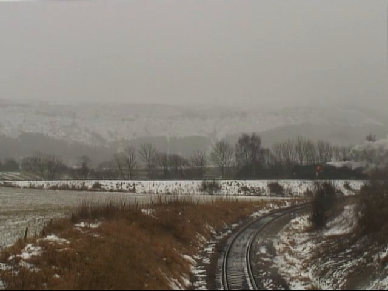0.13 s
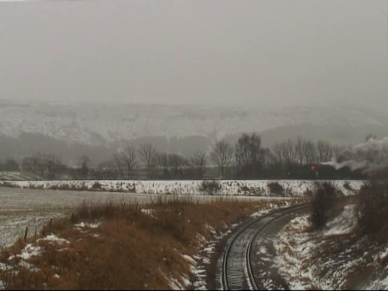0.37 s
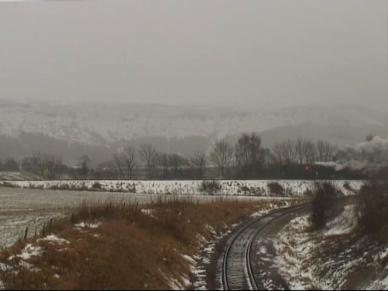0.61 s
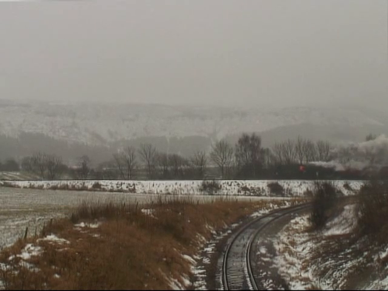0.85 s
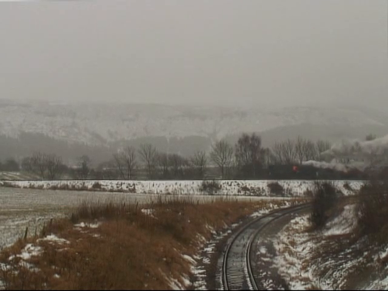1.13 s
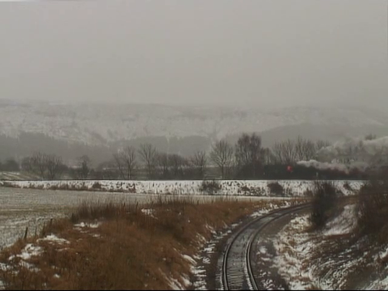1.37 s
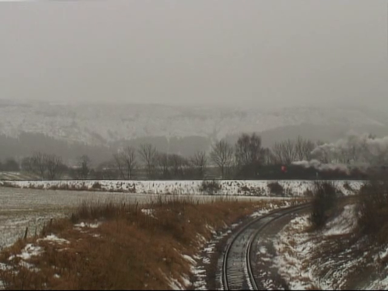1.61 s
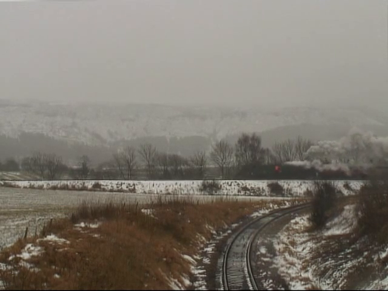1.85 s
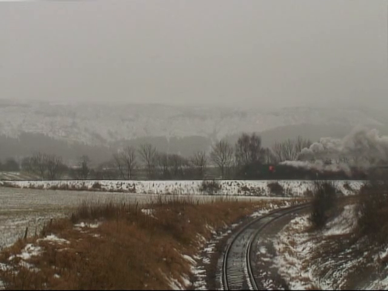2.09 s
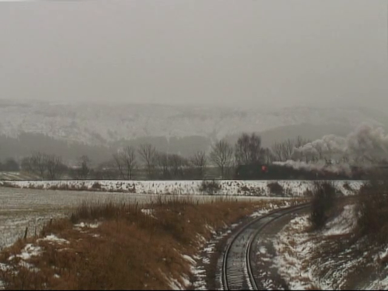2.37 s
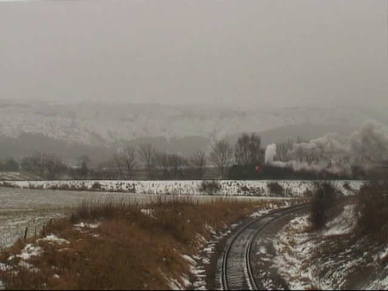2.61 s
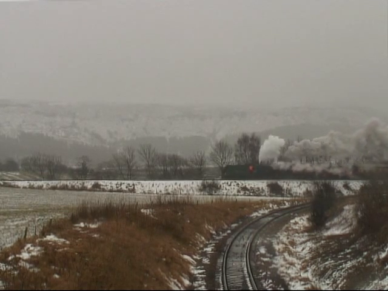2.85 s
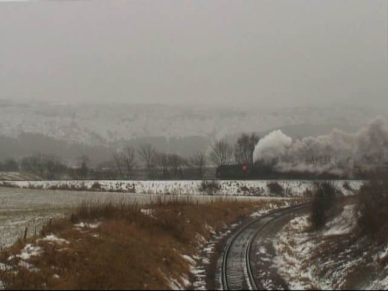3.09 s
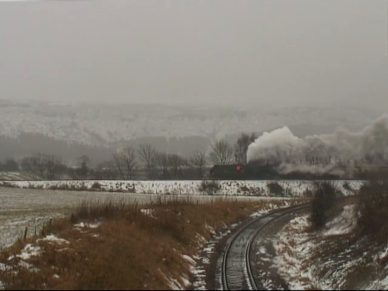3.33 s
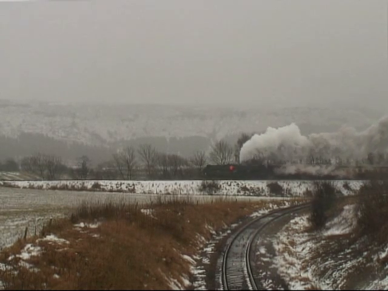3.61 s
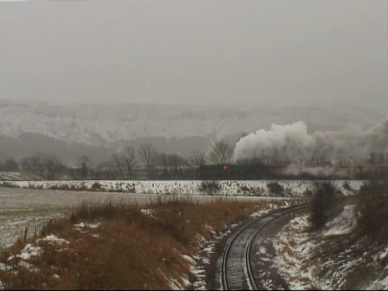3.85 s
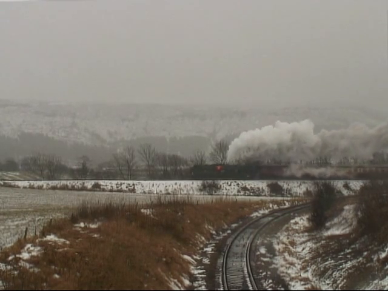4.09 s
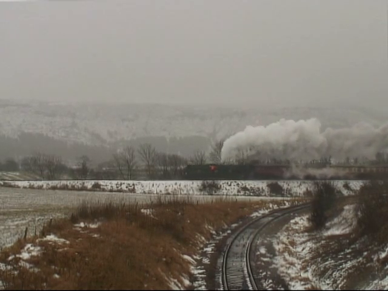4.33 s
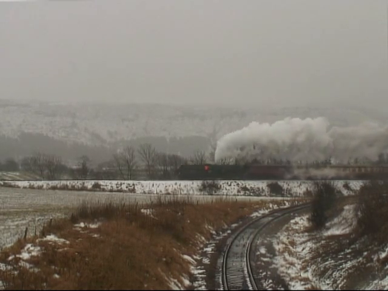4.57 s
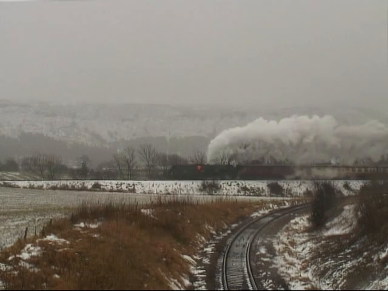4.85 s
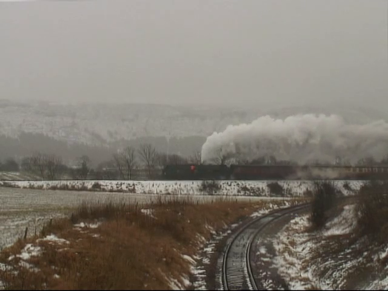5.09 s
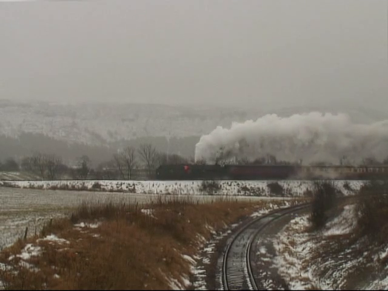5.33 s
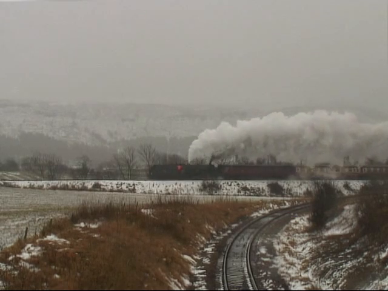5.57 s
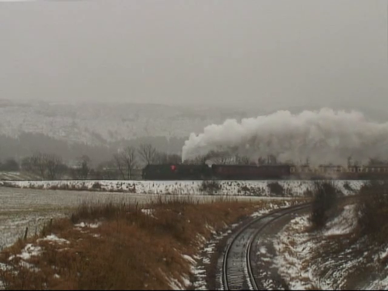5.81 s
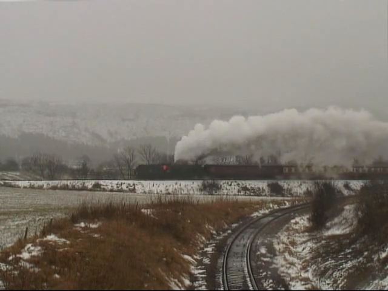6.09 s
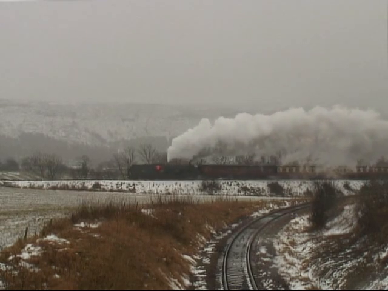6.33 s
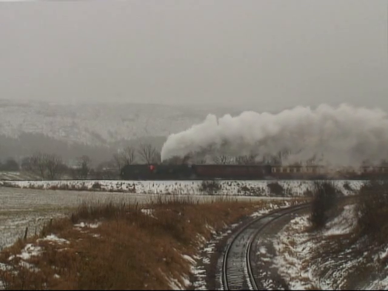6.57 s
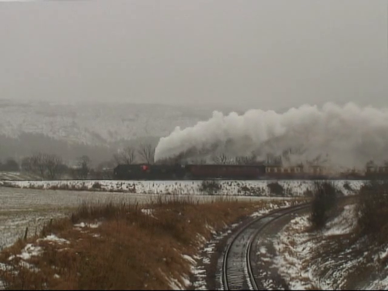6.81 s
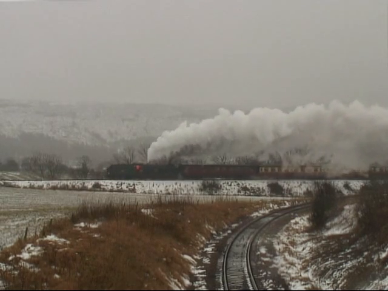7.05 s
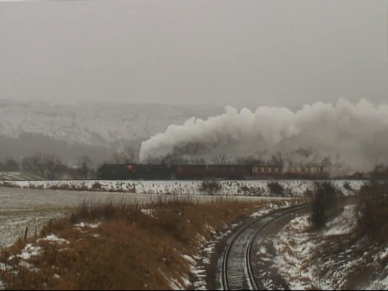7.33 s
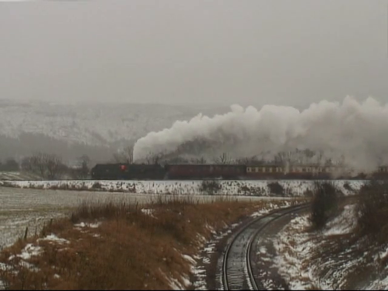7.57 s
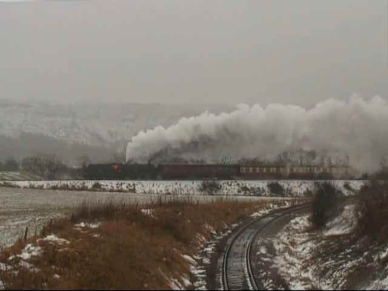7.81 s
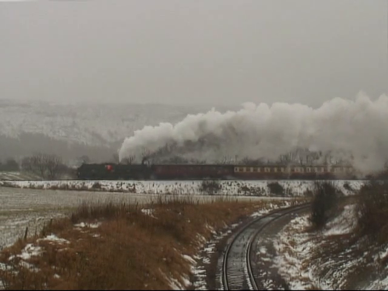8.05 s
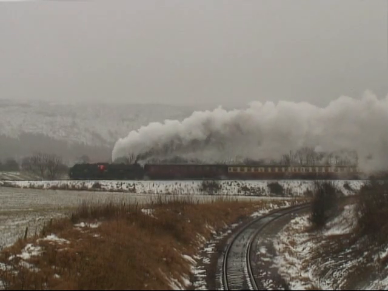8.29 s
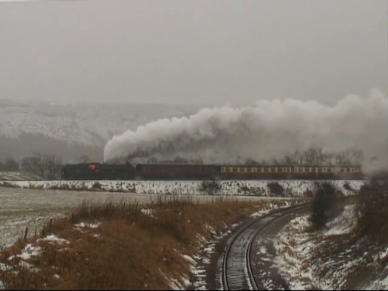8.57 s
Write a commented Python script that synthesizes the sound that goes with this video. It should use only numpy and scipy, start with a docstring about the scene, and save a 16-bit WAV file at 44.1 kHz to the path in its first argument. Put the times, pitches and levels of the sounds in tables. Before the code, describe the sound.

Quiet at first: rapid muffled exhaust beats, faint rumble, a breathy leak of steam swelling about once a second, and slight tape-camera hiss. At about 3.2 seconds a jet of steam erupts abruptly, far louder, with a short hollow echo off snow. It holds as a rushing roar, its brightness and strength wavering, while chuffs sink beneath. Outdoors, distant, with small wind thumps and a dull left channel.

```python
"""Soft exhaust beats and a thin hiss of leaking steam come first, from a three-cylinder steam locomotive
some way off across snowy fields; six beats make a wheel turn. Each beat is ragged noise ringing in the chimney.
The leak is shaped noise that swells about once a turn; filtered noise makes the rumble and the light wind.
Then the safety valve lifts: a jet of noise whose roar wavers through moving air, with an echo off the snow.
A tape camcorder adds hiss, a faint whine and a muffled left microphone port."""
import sys
import numpy as np
from scipy import signal
from scipy.fft import rfft, irfft
from scipy.io import wavfile
from scipy.ndimage import uniform_filter1d

SR = 44100
rng = np.random.default_rng(int(sys.argv[2]) if len(sys.argv) > 2 else 0)


def pcm_store(signal):
    """Save signal as 16-bit PCM."""
    levels = np.round(np.clip(np.atleast_2d(signal), -1, 1) * 32767)
    wavfile.write(sys.argv[1], SR, levels.astype(np.int16).T)


def nominal_scale(level):
    """Amplitude ratio for a level in decibels (scalar or array-like)."""
    x = np.asarray(level, float) / 20
    return 10 ** x


N = 382788  # length in samples


def evened(x):
    """Scales a sound to an rms of 1."""
    return x / np.sqrt(np.mean(x ** 2) + 1e-20)


def read(points, hz):
    """Reads a curve of (frequency, value) points on a log-frequency axis."""
    f, value = np.transpose(points)
    return np.interp(np.log(hz + 1), np.log(f + 1), value)


def add(mix, s, sound):
    """Mixes a sound in at time s."""
    part = mix[max(round(s * SR), 0):][:len(sound)]
    part += sound[:len(part)]


def coloured(tone, channels=1):
    """Steady noise of rms 1 with the given spectrum."""
    spectrum = rfft(rng.standard_normal((channels, N)))
    spectrum = spectrum * nominal_scale(read(tone, np.fft.rfftfreq(N, 1 / SR)))
    return evened(irfft(spectrum, N))


def ragged_gain(depth_db, smooth):
    """A randomly wandering gain; smooth is its averaging length in samples."""
    return nominal_scale(depth_db * evened(uniform_filter1d(rng.standard_normal(N), size=smooth)))


def level_curve(rows):
    """Turns (time, dB) rows into a gain at every sample."""
    s, db = np.transpose(rows)
    return nominal_scale(np.interp(np.arange(N) / SR, s, db))


def ramp(hz, lo_hz, hi_hz):
    """0 below lo_hz, 1 above hi_hz, straight on a log-frequency axis."""
    return np.clip(np.log((hz + 1) / lo_hz) / np.log(hi_hz / lo_hz), 0, 1)


def hump(hz, centre_hz, width):
    """A bell shape on the log-frequency axis."""
    return np.exp(-(np.log((hz + 1) / centre_hz) / width) ** 2)


def bell(t, start, length):
    """Half a sine from start to start + length."""
    return np.sin(np.pi * np.clip((t - start) / length, 0, 1))


def steam(tone, s, flow_db, shape_db, gust_db, band_db, flicker_db):
    """Jet noise with a spectrum bent by shape_db(hz, t); eddies add wide gusts, thin bands and flicker."""
    size, hop = 512, 128  # samples per short-time frame and per step
    frames, hz = N // hop + 6, np.fft.rfftfreq(size, 1 / SR)
    t = np.arange(frames) * hop / SR
    real, imaginary, gusts, bands = rng.standard_normal((frames, len(hz), 4)).T
    # axis 0 smooths across frequency, axis 1 across time
    gusts = evened(uniform_filter1d(uniform_filter1d(gusts, size=10, axis=0), size=22, axis=1))
    bands = evened(uniform_filter1d(uniform_filter1d(bands, size=3, axis=0), size=50, axis=1))
    flicker = evened(uniform_filter1d(rng.standard_normal(frames), size=4))
    eddies_db = gust_db * gusts + band_db * bands + flicker_db * flicker
    gain = nominal_scale(read(tone, hz)[:, None] + shape_db(hz[:, None], t) + eddies_db)
    # slow level changes in the middle band are evened out, so that flow_db sets them
    core = (hz > 1200) & (hz < 4500)
    gain /= np.sqrt(uniform_filter1d((gain[core] ** 2).sum(0), size=30))
    jet = signal.istft((real + 1j * imaginary) * gain, nperseg=size, noverlap=size - hop)[1][:N]
    return evened(jet) * nominal_scale(np.interp(np.arange(N) / SR, s, flow_db))


# exhaust beats that stand out: t/s, chimney level/dB (nominal peak, 5 dB over its rms), puff rms against it level/dB
BEATS = [(0.02, -26.5, -9.5), (0.187, -24, -8.5), (0.33, -34, -12), (0.47, -29.5, -10), (0.611, -36, -21),
         (0.776, -28.5, -10), (0.926, -27.5, -11.5), (1.088, -24.5, -13.5), (1.232, -29, -21),
         (1.349, -23, -15), (1.507, -32, -17), (1.679, -23, -19), (1.816, -24.5, -18), (1.979, -18, -18),
         (2.096, -26, -11), (2.251, -21.5, -10.5), (2.391, -31.5, -9.5), (2.555, -24, -11),
         (2.697, -27, -9), (2.865, -20.5, -16), (3.052, -29.5, -28), (3.274, -36.5, -17),
         (3.445, -28.5, -18), (3.6, -32, -12.5), (3.74, -26.5, -13)]
# resonances of the chimney: f/Hz, width f/Hz, relative level/dB
CHIMNEY = [(243, 50, 0), (340, 200, -9), (175, 80, -13), (480, 200, -15)]
# spectrum of the puff: f/Hz, relative level/dB (per Hz)
PUFF = [(300, -6.5), (450, 2), (700, 0.5), (1200, 1.5), (2000, -5), (3300, -14), (6000, -30.5),
        (9000, -68.5)]
BEAT_LENGTH_S, BEAT_GAP_S = 0.12, 0.149  # the gap gives six beats a wheel turn
# beats under the roar, fading with distance
LATER_DB, LATER_FADE_DB_PER_S, LATER_SPREAD_DB, LATER_PUFF_DB = -32, 2.7, 4.5, -4


def exhaust():
    """Each beat is a burst of ragged noise that rings the chimney, with a puff of hiss above it."""
    last_s = BEATS[-1][0]
    since = np.arange(BEAT_GAP_S, N / SR - last_s, BEAT_GAP_S)
    later_db = LATER_DB - LATER_FADE_DB_PER_S * since
    later_db = later_db + LATER_SPREAD_DB * rng.standard_normal(len(since))
    later = [(last_s + wait, db, LATER_PUFF_DB) for wait, db in zip(since, later_db)]

    boom, puff = np.zeros(N), np.zeros(N)
    swell = np.sin(np.pi * np.linspace(0, 1, round(BEAT_LENGTH_S * SR)) ** 0.85) ** 1.01
    for s, db, puff_db in BEATS + later:
        start = s - 0.02  # the swell begins just before the listed time
        add(boom, start, nominal_scale(db - 5.0) * swell)
        add(puff, start, nominal_scale(db + puff_db) * swell ** 1.4)

    ragged = ragged_gain(2.53, 250)
    hz = np.fft.rfftfreq(N, 1 / SR)
    pipe = np.sqrt(sum((nominal_scale(db) / (1 + ((hz - f) / (w / 2)) ** 2)) ** 2 for f, w, db in CHIMNEY))
    ring = evened(irfft(rfft(rng.standard_normal(N) * ragged) * pipe, N))
    return boom * ring + puff * evened(coloured(PUFF)[0] * ragged)


# leaking steam, swelling about once a turn: t/s, flow level/dB, treble level/dB (its rise or fall about the mean)
LEAK = [(0.0, -43.5, -12), (0.25, -45.5, -15.5), (0.3, -48.5, -10.5), (0.68, -51, -11), (0.8, -45, -6.5),
        (1.19, -47.5, -10.5), (1.45, -51.5, -10), (1.6, -45.5, -14.5), (1.76, -44.5, -3.5),
        (2.01, -36.5, -14), (2.3, -39.5, -18), (2.38, -42.5, -19), (2.66, -40.5, -10), (2.83, -43, -13),
        (2.96, -33, -20.5), (3.14, -36, -13)]
# spectrum of the leak before shaping: f/Hz, relative level/dB (per Hz)
LEAK_TONE = [(530, -35), (900, -6.5), (1320, -2), (1470, -2.5), (1860, -1), (2340, -1), (3330, -1.5),
             (8770, -26), (10000, -49), (13000, -81), (22000, -120)]
LEAK_HZ = 2650  # centre of the hiss
LEAK_FOCUS_PER_DB = 0.36  # stronger flow gathers round the centre


def leak():
    """Thin hiss of steam jets from glands and cocks; it runs on under the valve."""
    s, flow_db, treble_db = np.transpose(LEAK)

    def shape(hz, t):
        treble = ramp(hz, 3200, 5200) * np.interp(t, s, treble_db - treble_db.mean())
        focus_db = 3.5 + LEAK_FOCUS_PER_DB * np.interp(t, s, flow_db - flow_db.mean())
        return treble + focus_db * hump(hz, LEAK_HZ, .25)

    return steam(LEAK_TONE, s, flow_db, shape, gust_db=1.8, band_db=0.0, flicker_db=0.5)


# rumble of the train under the beats: t/s, level/dB
RUMBLE = [(0.0, -42.5), (1.3, -40), (2.7, -39), (3.17, -34.5), (3.85, -38.5), (4.06, -43), (4.45, -35),
          (4.71, -49), (4.9, -34), (5.42, -32), (5.6, -34.5), (6.6, -42.5), (7.3, -47), (8.68, -47)]
# its spectrum: f/Hz, relative level/dB (per Hz)
RUMBLE_TONE = [(59, -5.5), (100, -12), (238, 3), (627, -6), (1330, -8.5), (1580, -14), (2460, -14.5),
               (3000, -45), (3900, -47), (6600, -120)]


def rumble():
    """Wheels, rods and the echo of the exhaust off the valley, as low noise that rises and sinks."""
    return level_curve(RUMBLE) * coloured(RUMBLE_TONE)[0]


# wind on the microphone: t/s, level/dB before the random lumps
WIND = [(0.0, -47.5), (0.31, -54), (0.46, -38.5), (0.85, -49.5), (1.37, -44), (2.05, -42.5), (2.3, -49),
        (3.14, -42.5), (3.4, -52), (4.7, -49.5), (5.25, -44.5), (6.0, -49.5), (6.28, -40.5), (6.82, -55.5),
        (7.08, -44), (7.9, -52.5), (8.5, -47.5), (8.68, -49)]
# its spectrum: f/Hz, relative level/dB (per Hz)
WIND_TONE = [(8.8, -32), (15, -15.5), (48, 2), (97, -7), (180, -2), (230, -25), (400, -120)]
# buffets of wind: start t/s, level/dB (crest of the tone), pitch f/Hz, length t/s
BUFFETS = [(3.132, -36, 100.6, 0.053), (5.76, -36.5, 69.6, .08), (6.63, -34, 121, 0.065),
           (6.664, -27.5, 80.6, 0.076), (7.038, -33.5, 109.7, .11), (7.63, -40.5, 80, .08)]


def wind():
    """Air pushing on the microphone: two lumpy low noises and a few soft thumps shared by both."""
    lumps = ragged_gain(2.2, 3000)
    out = level_curve(WIND) * evened(coloured(WIND_TONE, channels=2) * lumps)
    for s, db, hz, length in BUFFETS:
        t = np.arange(round(length * SR)) / SR
        rustle_tone = [(hz / 2, -6), (hz, 0), (3 * hz, -8), (6 * hz, -50)]
        rustle = evened(coloured(rustle_tone)[0][:len(t)])
        thump = nominal_scale(db) * np.hanning(len(t)) * (np.sin(2 * np.pi * hz * t) + .6 * rustle)
        add(out[0], s, thump)
        add(out[1], s, thump)
    return out


# microphone hiss before each port's trim: f/Hz, level/dB (per Hz)
SELF_NOISE = [(300, -94), (3000, -100), (8000, -102), (12000, -104), (14000, -107)]
# whine of the tape drum motor before each port's trim: f/Hz, level/dB (peak of the sine)
WHINE = [(7267, -82), (8102, -82), (8398, -88), (10799, -86), (11999, -91), (12301, -92), (12602, -94),
         (12898, -92), (13200, -89), (13501, -90), (13803, -91), (14099, -92)]


def camera_noise():
    """Microphone hiss and the faint sine tones of the tape drum, both stronger at the right port."""
    hz = np.fft.rfftfreq(N, 1 / SR)
    density = nominal_scale(read(SELF_NOISE, hz)) * np.sqrt(SR / 2)
    hiss = irfft(rfft(rng.standard_normal((2, N))) * density, N)
    t = np.arange(N) / SR
    whine = sum(nominal_scale(db) * np.sin(2 * np.pi * (f * t + rng.random())) for f, db in WHINE)
    return hiss * nominal_scale([[-7.0], [.1]]) + whine * nominal_scale([[-14], [3]])  # trims: left, right


# safety valve as the moving air delivers it: t/s, level/dB, brightness level/dB (scaled by band in shape)
VALVE = [(3.158, -13, 1), (3.25, -15.5, -2.5), (3.5, -13.5, -6.5), (3.61, -14.5, 4.5), (3.71, -14, -4.5),
         (3.89, -15, 4.5), (3.95, -14.5, -3), (4.01, -14, 3.5), (4.07, -14.5, -2), (4.16, -14, 0),
         (4.29, -16.5, -3.5), (4.41, -15.5, 3.5), (4.53, -14.5, -4), (4.79, -15.5, -4.5), (4.91, -22, 2.5),
         (5.08, -16.5, -0.5), (5.2, -20, -1.5), (5.48, -18, 0.5), (5.57, -14.5, -3), (5.82, -17.5, 1.5),
         (5.9, -17, 4), (6.02, -17, -2.5), (6.13, -20.5, 3.5), (6.36, -18, 0.5), (6.47, -15, 1),
         (6.63, -20, 3), (6.72, -15.5, -5), (6.83, -16.5, 2.5), (7.06, -16, -2.5), (7.14, -20, 2.5),
         (7.26, -16.5, 0), (7.41, -16.5, 4.5), (7.51, -19.5, -6), (7.7, -14.5, -4), (7.85, -18, 1.5),
         (8.021, -24, -2), (8.17, -16.5, 4.5), (8.27, -16, 0.5), (8.45, -19, -2.5), (8.57, -16, 2.5),
         (8.68, -18.5, 2.5)]
# spectrum of the roar before shaping: f/Hz, relative level/dB (per Hz)
VALVE_TONE = [(120, -52), (200, -67), (239, -28), (280, -25.5), (341, -7), (422, -8), (613, -7),
              (2170, -3.5), (2930, -2), (5460, -12), (8070, -27), (10700, -53), (14000, -106)]
# echo off the snow, fading as the train draws away: t/s, share (0-1), scattered above about f/Hz
ECHO = [(3.16, 0.53, 3000), (3.75, 0.3, 2800), (4.1, 0.17, 1390), (6.2, 0.26, 900), (6.8, 0.08, 1400),
        (7.3, 0, 900), (8.68, 0, 900)]
# bands that brighten or dim for a moment: start t/s, end t/s, start f/Hz, end f/Hz, peak change level/dB
STREAKS = [(3.048, 3.6, 830, 790, 4.5), (3.203, 3.6, 2650, 2500, 2.5), (3.696, 3.948, 2100, 1580, 4.5),
           (4.784, 5.023, 2050, 1850, 8.5), (5.477, 5.7, 2650, 2830, 2), (5.54, 5.9, 2110, 2170, 3.5),
           (4.35, 4.547, 2600, 2850, -3.5), (4.4, 4.65, 1200, 2600, 2.5), (5.003, 5.198, 3300, 3600, 5),
           (5.84, 6.04, 4800, 5170, 5), (6.11, 6.624, 916, 2810, 4.5), (6.545, 6.75, 1700, 1185, 5.5),
           (6.682, 6.902, 3370, 4330, 5.5), (6.799, 7.145, 2370, 2030, 3.5),
           (7.112, 7.276, 3920, 3500, -0.5), (7.305, 7.46, 3580, 4660, 3), (7.47, 7.7, 3210, 2950, -8.5),
           (7.5, 7.75, 1980, 1690, 3), (7.75, 8.105, 2310, 1810, -4.5), (8.04, 8.243, 2730, 5200, 6),
           (8.138, 8.513, 1360, 2070, 8.5), (8.297, 8.5, 3300, 3000, -3), (8.505, 8.662, 2730, 3950, 1)]
# the low roar swells or sinks: middle t/s, length t/s, peak change level/dB, top f/Hz (a gradual edge)
SWELLS = [(3.452, .6, -4.5, 604), (3.86, 0.22, 6, 1760), (4.1, 0.65, -6, 1000), (4.392, 0.36, 6.5, 1650),
          (4.733, 0.51, -3.5, 1600), (5.427, 0.37, 3, 1270), (5.98, 0.22, -5, 1630),
          (6.515, 0.16, -6, 1830), (6.816, 0.23, -0.5, 1310), (7.65, 0.25, -0.5, 905), (8.508, 1, 1, 1100)]
RISE_S = 0.014  # the valve pops open
JET_HZ, JET_RISE_PER_DB = 2600, .02  # the centre of the jet climbs with brightness
BASS_STEADY, BODY_STEADY = 1, 0.46  # share of the level's wavering that the low roar ignores
STREAK_WIDTH = .16  # on the log-frequency axis
ECHO_MS, ECHO_SHRINK_MS_PER_S = 1.86, .05
# the recorder's high hiss, strong as the valve opens, fades while the gain control settles
TOP_HISS_DB, TOP_HISS_FADE_S = 42, .9


def valve():
    """Moving air shakes the jet's upper part more than its low roar; an inverted echo off the snow combs it."""
    s, level_db, bright_db = np.transpose(VALVE)
    echo_s, share, rough_hz = np.transpose(ECHO)

    def shape(hz, t):
        waver = np.interp(t, s, level_db - level_db.mean())
        bright = np.interp(t, s, bright_db)
        low = 1 - ramp(hz, 870, 1430)

        bent = (ramp(hz, 2900, 5200) + 0.19 * ramp(hz, 5500, 9000)) * bright
        bent += 1.57 * hump(hz, JET_HZ * (1 + JET_RISE_PER_DB * bright), .24)
        bent -= waver * (BASS_STEADY * low + BODY_STEADY * hump(hz, 1450, 0.27))
        bent += -1.5 * low + .5 * hump(hz, 1100, 0.1) + .5 * hump(hz, 4000, 0.067)
        fade = np.exp(-np.maximum(t - s[0], 0) / TOP_HISS_FADE_S)
        bent += TOP_HISS_DB * ramp(hz, 10500, 14000) * fade

        for middle, length, db, top_hz in SWELLS:
            below_top = 1 - ramp(hz, 0.81 * top_hz, 1.85 * top_hz)
            bent += db * bell(t, middle - length / 2, length) * below_top
        for t0, t1, f0, f1, db in STREAKS:
            centre_hz = f0 + (f1 - f0) * np.clip((t - t0) / (t1 - t0), 0, 1)
            bent += db * bell(t, t0, t1 - t0) * hump(hz, centre_hz, STREAK_WIDTH)

        # rough snow scatters the treble, so only the lower part echoes clearly
        rough = np.interp(t, echo_s, rough_hz)
        echo = np.clip(np.interp(t, echo_s, share), 0, .9) * (1 - ramp(hz, .85 * rough, 1.25 * rough))
        delay_s = (ECHO_MS - ECHO_SHRINK_MS_PER_S * (t - s[0])) / 1000
        comb = abs(1 - echo * np.exp(-2j * np.pi * hz * delay_s))
        return bent + 20 * np.log10(comb)

    opening = np.clip((np.arange(N) / SR - s[0]) / RISE_S + 1, 0, 1) ** 2
    return opening * steam(VALVE_TONE, s, level_db, shape, gust_db=1.5, band_db=1.32, flicker_db=0.36)


def scattered(x):
    """Short reflections around the camera body scramble the phase."""
    grid = np.arange(0, SR / 2 + 60, 12)  # Hz
    wander = np.cumsum(2 * rng.standard_normal(len(grid)))
    turn = np.interp(np.fft.rfftfreq(N, 1 / SR), grid, wander)
    return irfft(rfft(x) * np.exp(1j * turn), N)


# left port against right: f/Hz, level/dB
LEFT_DB = [(40, -4), (90, -0.5), (200, 0.5), (300, -0.5), (500, -4), (1000, -4.5), (1400, -7.5),
           (2000, -10), (2500, -16), (3000, -20), (3600, -32.5), (5000, -31.5), (7000, -55), (14000, -52)]
# how far the left port's phase leads: f/Hz, phase/radians
LEFT_LEAD = [(30, 1.7), (260, 1.7), (450, 1.27), (1000, .8), (2300, .2), (3500, -.6), (4500, -1.5),
             (9000, -1.0)]
# how alike the two ports sound: f/Hz, likeness (0-1)
LEFT_SAME = [(40, .6), (110, .55), (200, .94), (1400, .97), (3000, .9), (5000, .7), (9000, .4)]


def ports(x, stray):
    """The left port is muffled and turned in phase; part of what it hears is the unrelated sound stray."""
    hz = np.fft.rfftfreq(N, 1 / SR)
    left = nominal_scale(read(LEFT_DB, hz)) * np.exp(1j * read(LEFT_LEAD, hz))
    same = np.clip(read(LEFT_SAME, hz), 0, 1)
    right_sound = rfft(x)
    left_sound = left * (same * right_sound + np.sqrt(1 - same ** 2) * rfft(stray))
    # keeps the strength of the shared sound when the two ports are averaged
    return irfft(2 * np.array([left_sound, right_sound]) / abs(1 + same * left), N)


def scene():
    """Train and wind reach the pair of ports."""
    train = exhaust() + leak() + rumble() + valve()
    air = wind()
    return ports(train + air[0], scattered(train) + air[1])


def top_cut(x):
    """Nothing passes above the cut-off."""
    return signal.sosfilt(signal.butter(12, 15030, fs=SR, output="sos"), x)


def record(dry):
    """Adds camera noise; slow gain control turns loud passages down, peaks are squeezed, the top is cut."""
    x = dry + camera_noise()
    power_db = 10 * np.log10(abs(uniform_filter1d((x ** 2).max(0), size=4000)) + 1e-12)
    keep = np.exp(-1 / (.45 * SR))  # reacts over 0.45 s
    over_db = signal.lfilter([1 - keep], [1, -keep], np.maximum(power_db + 19, 0))  # above -19 dB
    x = x / nominal_scale(.35 * over_db)
    x = x / (1 + abs(x) ** 14) ** (1 / 14)  # a soft knee near full scale
    low_pass = signal.firwin(401, 14450, fs=SR)  # Hz
    finished = signal.oaconvolve(x, low_pass[None], "same")
    return top_cut(finished)


dry = scene()
out = record(dry)
pcm_store(out)
```